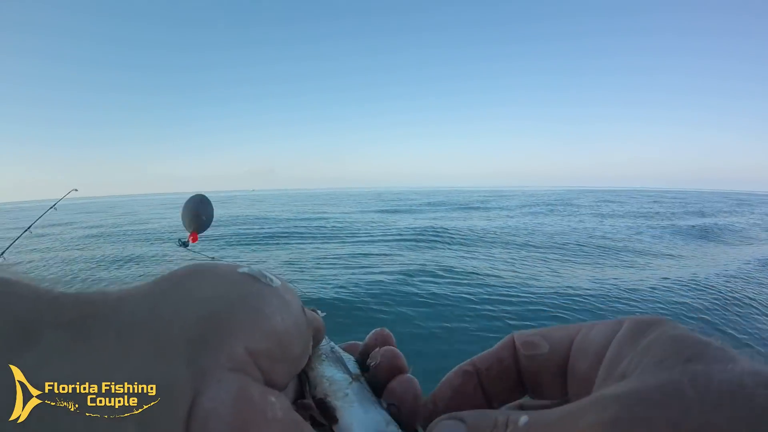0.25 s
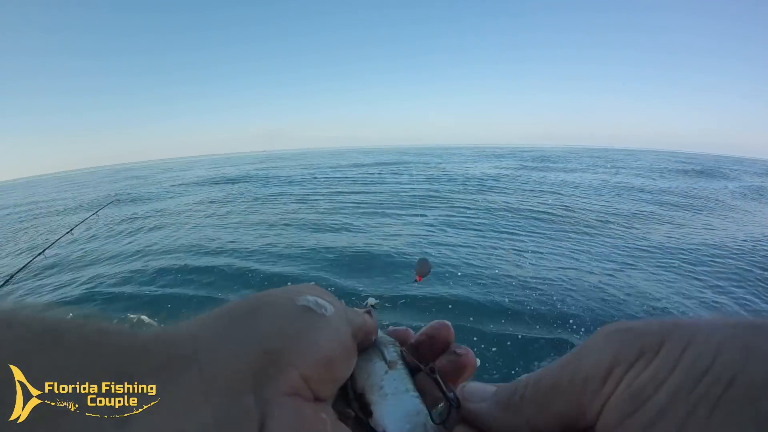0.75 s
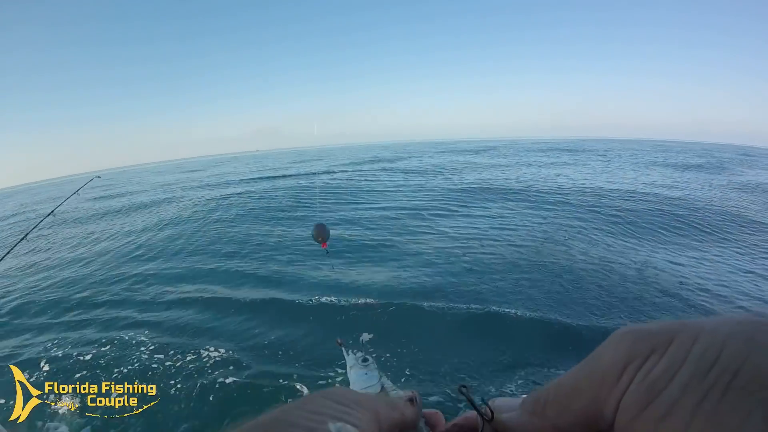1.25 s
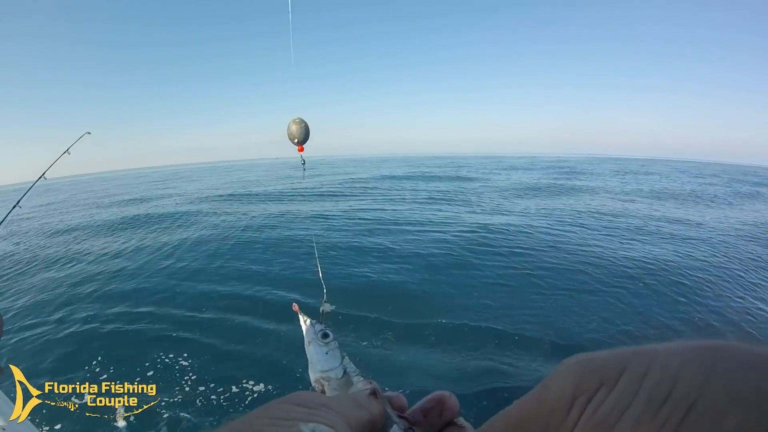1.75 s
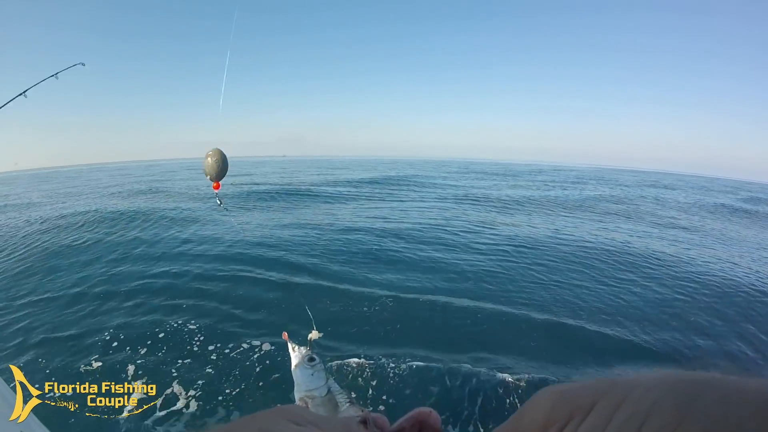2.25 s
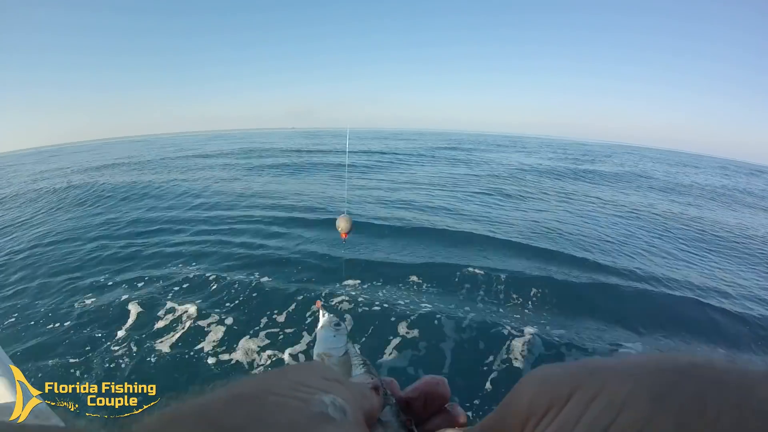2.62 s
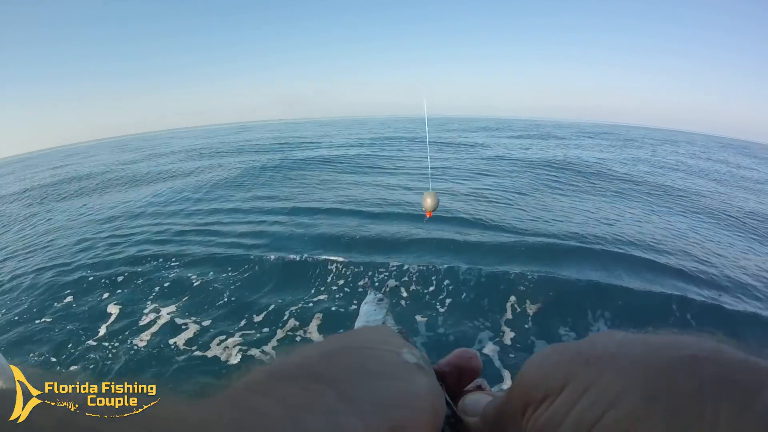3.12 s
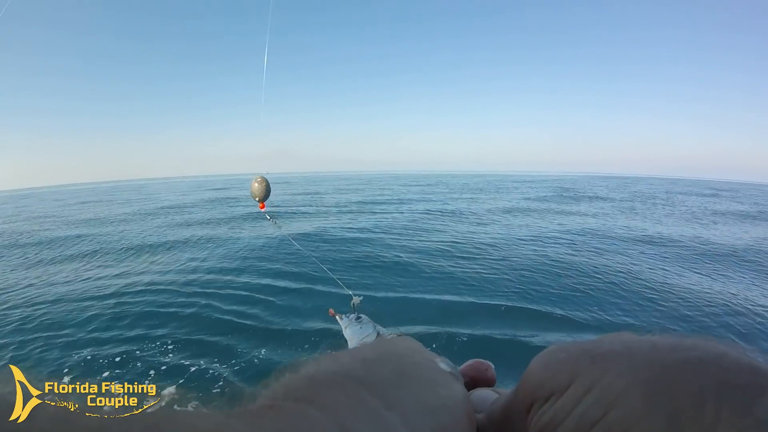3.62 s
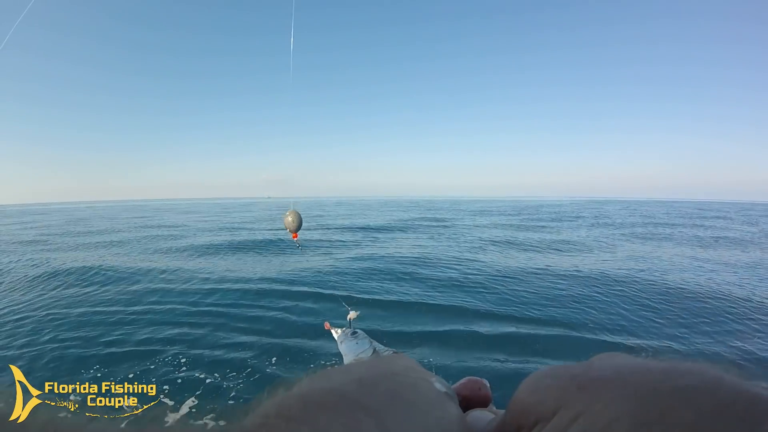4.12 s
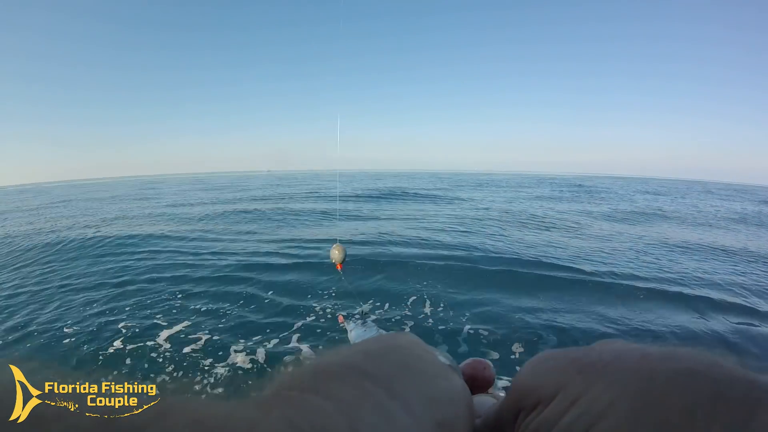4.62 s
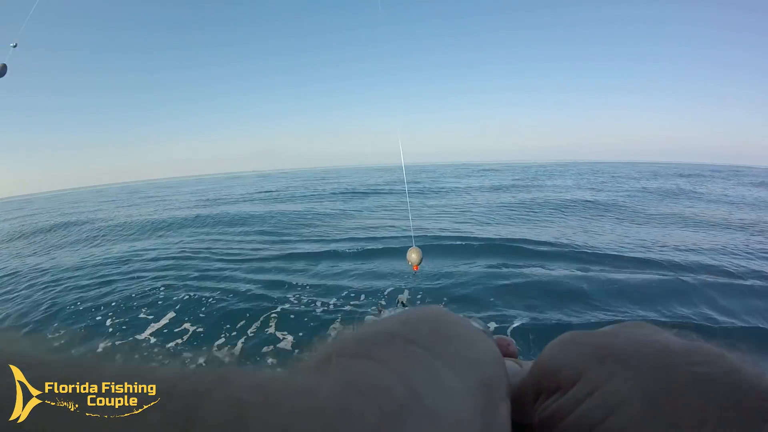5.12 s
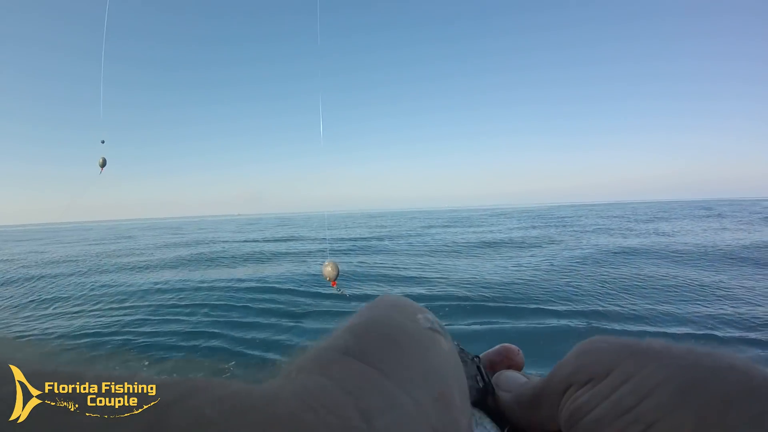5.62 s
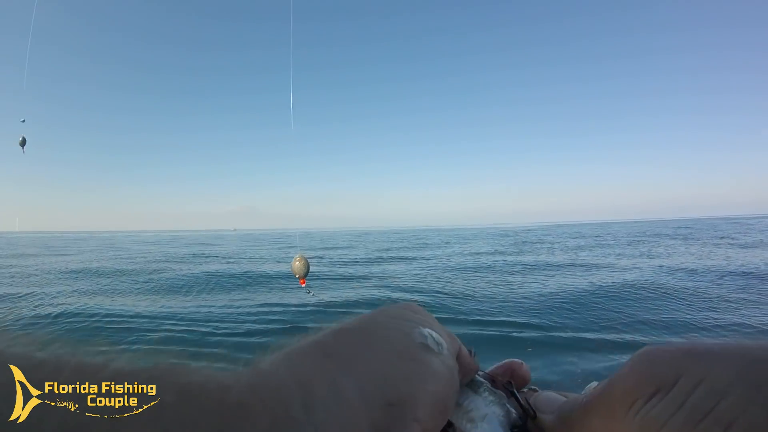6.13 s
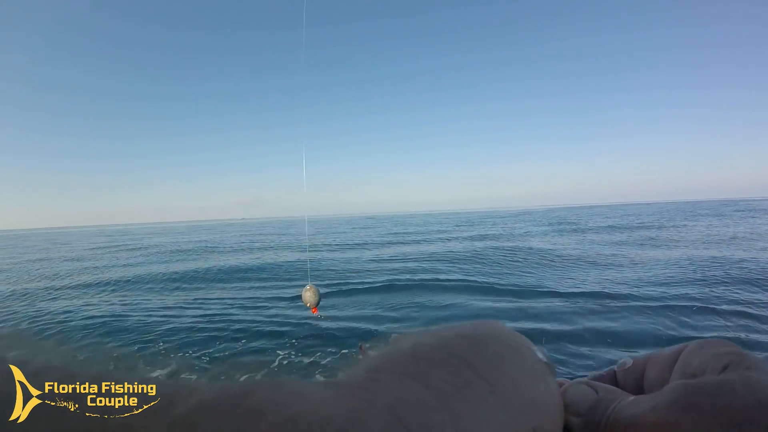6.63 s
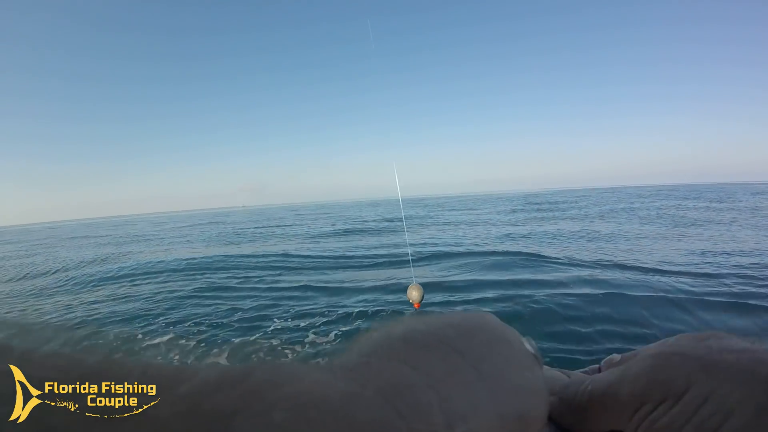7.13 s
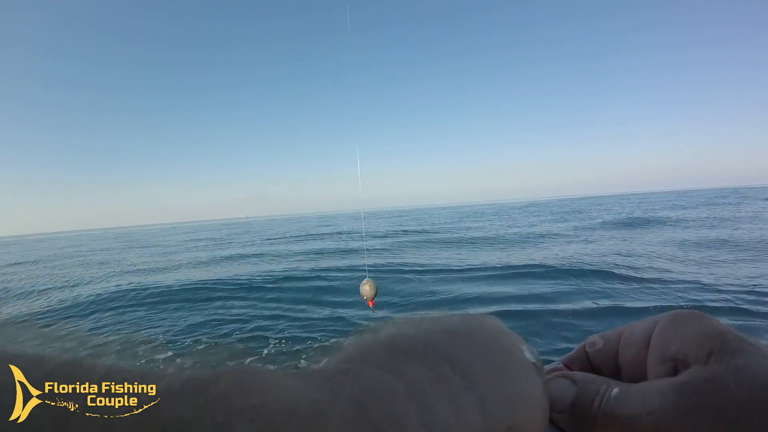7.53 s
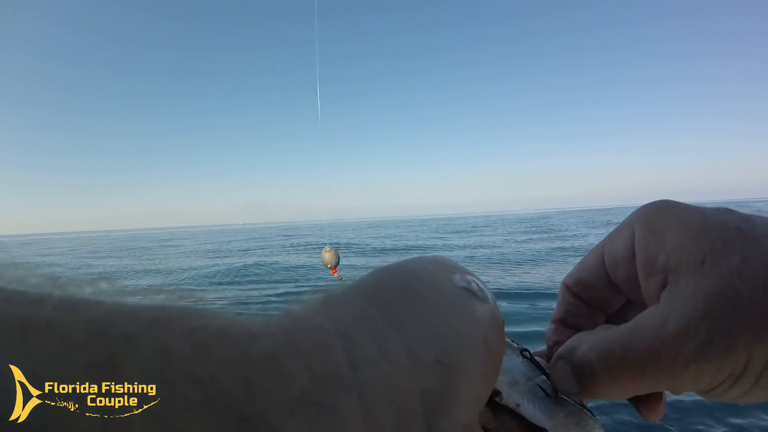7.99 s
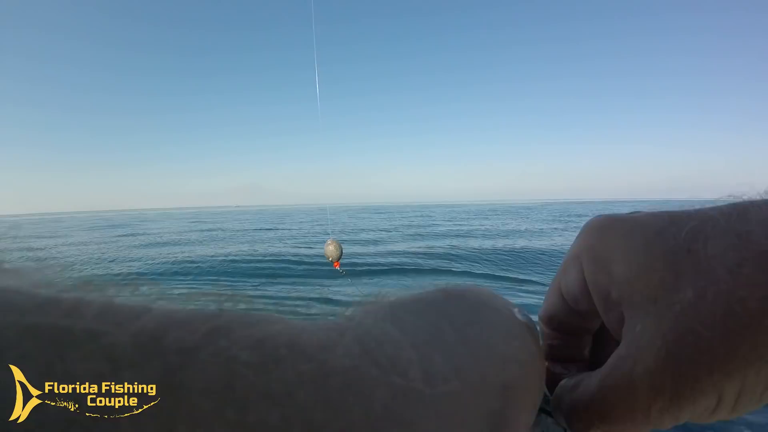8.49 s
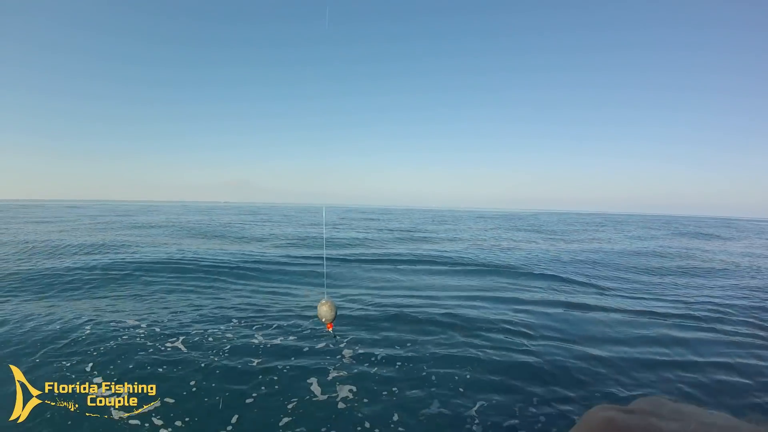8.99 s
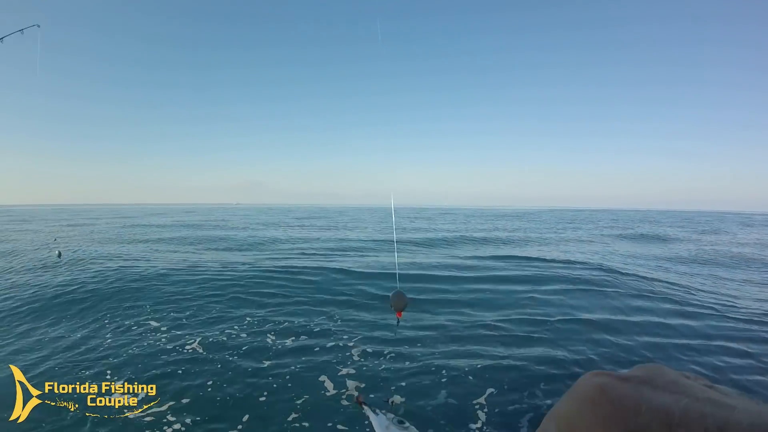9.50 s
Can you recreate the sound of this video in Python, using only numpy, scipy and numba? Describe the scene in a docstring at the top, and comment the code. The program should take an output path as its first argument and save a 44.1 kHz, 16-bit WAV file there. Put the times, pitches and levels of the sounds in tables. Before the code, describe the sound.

Irregular wet slaps, gulps and low hull booms, heard close on board a small boat. The first five seconds are busy, with bubbling froth, spray and ticking drops between blows; the rest is sparse, with faint plops, brief hollow pipe-like hums and gentle slaps near six and a half and eight and a half seconds. Open air, no echo, single-channel boxed-in microphone with a ringing treble edge and low steady hiss.

```python
"""Wavelets of a calm sea lap against the hull of a drifting boat, heard by a small cased microphone on board.
Crowds of decaying, gliding sines boom the hull, gulp, bubble and spray under slow wash and brief surges.
Harder blows slap with filtered noise bursts and a sagging plop; drops tick as damped sines.
Lone air pockets sing gliding notes, and a drain pipe closed at one end hums in odd partials.
Shaped noise gives far water and hiss; the microphone port rings in the treble and the case dulls it."""
import sys
import numpy as np
from scipy import signal
from scipy.fft import rfft, irfft, next_fast_len
from scipy.io import wavfile
from numba import njit

SR = 44100
rng = np.random.default_rng(int(sys.argv[2]) if len(sys.argv) > 2 else 0)


def pcm_store(signal):
    """Save signal as 16-bit PCM."""
    levels = np.round(np.clip(np.atleast_2d(signal), -1, 1) * 32767)
    wavfile.write(sys.argv[1], SR, levels.astype(np.int16).T)


N = 429974  # samples

# slow wash along the hull: (time [s], hull rumble level [dB], gulping level [dB], spray level [dB])
WASH = [(0, -65, -42.5, -36), (.21, -46, -46.5, -54.5), (.6, -38, -55, -43), (.97, -40, -48, -43.5),
        (1.17, -46, -45, -49.5), (1.58, -35.5, -41, -53.5), (1.75, -37, -35, -50),
        (2.02, -41.5, -35.5, -43.5), (2.16, -42.5, -46, -57.5), (2.72, -37.5, -34, -44.5),
        (3.07, -44.5, -46, -53.5), (3.38, -50, -52, -59), (3.94, -43, -35.5, -48), (4.27, -48.5, -50, -57),
        (4.78, -44, -37.5, -52), (5.02, -48, -49.5, -57.5), (5.74, -43, -53, -60.5),
        (5.89, -46.5, -47, -55), (6.46, -41, -58.5, -60), (6.65, -50, -48.5, -56.5), (7.22, -44, -63, -62),
        (8.09, -50.5, -59.5, -66.5), (8.9, -45, -53.5, -60.5), (9.75, -48.5, -60.5, -65.5)]
BUBBLING_OVER_MEAN_DB = -5  # wash bubbling, against the mean of gulping and spray in dB
# wavelets that break on the hull:
# (crest time [s], hold [s], gulping level [dB], bubbling level [dB], spray level [dB])
SPLASHES = [(0., 0.0025, -34, -36.5, -50), (0.349, 0.018, -35.5, -88, -72),
            (0.466, 0.0099, -26, -31.5, -24), (0.699, 0.057, -29, -38.5, -36),
            (0.755, 0.022, -34, -47, -33.5), (0.804, 0.13, -32.5, -43.5, -32.5),
            (1.203, 0.097, -63, -47, -42.5), (1.687, 0.049, -32.5, -43.5, -70),
            (1.89, 0.066, -46, -40.5, -57), (2.44, 0.011, -50, -38.5, -32.5),
            (2.464, 0.0066, -23.5, -31, -62), (2.677, 0.0066, -30, -32, -37), (3.538, 0.014, -34, -51, -79),
            (3.88, 0.12, -60, -46.5, -46.5), (4.522, 0.02, -26.5, -42, -39.5),
            (4.755, 0.058, -36, -58, -44.5), (6.519, 0.0033, -33, -38.5, -40),
            (6.622, 0.016, -42, -57, -48), (6.824, 0.082, -53, -58, -70), (7.579, 0.022, -40.5, -67, -82),
            (8.523, 0.055, -43, -50, -60), (8.775, 0.0099, -66, -78, -47), (8.852, 0.009, -42.5, -60, -68)]
SPLASH_RISE_DB_S = 582
# decay rates of a splash: gulping [dB/s], bubbling [dB/s], spray [dB/s]
SPLASH_FALLS = [266, 426, 417]
# heavier pushes that boom the hull: (crest time [s], hold [s], level [dB])
BOOMS = [(0., 0.0081, -35.5), (0.512, 0.08, -29.5), (2.034, 0.033, -33), (2.47, 0.068, -33.5),
         (2.668, 0.017, -26.5), (3.325, 0.017, -19.5), (3.386, .005, -24.5), (3.442, 0.06, -24.5),
         (3.765, 0.037, -31.5), (3.865, 0.02, -30), (4.584, 0.051, -24.5), (6.57, 0.061, -41),
         (7.49, 0.092, -40), (8.495, 0.041, -28)]
BOOM_RISE_DB_S, BOOM_FALL_DB_S = 246, 220
# hull resonances: (frequency [Hz], bandwidth [Hz], relative gain [dB])
HULL_MODES = [(49.7, 110, 8.5), (97.7, 18, 6.5)]
# slaps on the hull: (time [s], relative crack level [dB], crack frequency [Hz], relative plop level [dB],
# plop starting frequency [Hz], relative spray level [dB], 60 dB decay time of crack and spray [s])
SLAPS = [(0.441, -30, 1130, -31, 130, -33, 0.14), (0.463, -7.5, 610, -18.5, 165, -24, 0.027),
         (0.689, -16, 685, -23.5, 465, -50, 0.037), (2.408, -28.5, 1330, -36, 132, -43, 0.034),
         (2.453, -13, 700, -20, 395, -50, 0.017), (2.473, -23, 1500, -19.5, 182, -45, 0.015),
         (2.68, -4.5, 860, -17, 185, -20.5, 0.019), (4.484, -26.5, 1340, -41, 390, -42, 0.026),
         (4.525, -38, 738, -30, 245, -34, 0.019), (4.541, -26, 830, -30.5, 240, -33, 0.045),
         (5.773, -42, 686, -41, 301, -81, 0.063), (6.501, -15.5, 706, -24.5, 373, -33.5, 0.037),
         (6.523, -28, 710, -28, 174, -43, 0.019), (8.127, -45, 2030, -53, 132, -46, 0.1),
         (8.148, -36, 965, -54.5, 167, -39.5, 0.12), (8.47, -32.5, 610, -29, 129, -50, 0.029),
         (8.845, -46, 1480, -29.5, 260, -46, 0.023), (9.215, -42.5, 780, -36, 198, -73, 0.032)]
# hull side resonances under a slap: (frequency [Hz], bandwidth [Hz], relative gain [dB])
KNOCK_MODES = [(110, 48, 6.5), (200, 48, -3)]
# single drops that strike the hull:
# (time [s], relative tick level [dB], tick frequency [Hz], relative spray level [dB])
DROPS = [(0.662, -27, 680, -48), (0.458, -42, 1500, -24), (0.708, -35, 900, -27), (0.739, -22.5, 3370, -35),
         (0.759, -42, 1500, -25.5), (0.882, -21, 1740, -33), (1.578, -30, 616, -65),
         (1.673, -22.5, 715, -67), (1.755, -28, 1750, -55), (2.442, -28, 2030, -31),
         (2.463, -29, 1500, -35), (2.476, -30, 1980, -34), (2.654, -38, 1000, -35), (2.633, -24, 650, -42),
         (3.824, -27, 680, -65), (4.062, -33, 1600, -35), (4.333, -26, 780, -49), (4.433, -34, 900, -31),
         (4.453, -35, 1200, -33.5), (4.511, -27, 1450, -32), (4.549, -26, 1620, -37),
         (4.583, -28.5, 1150, -56), (4.876, -35, 815, -56), (4.738, -30.5, 1110, -55),
         (4.637, -45, 1000, -39), (4.751, -40, 1500, -44), (5.721, -41.5, 1970, -44),
         (5.913, -38.5, 2050, -40), (5.173, -31.5, 1210, -57), (6.229, -42, 1060, -37),
         (6.869, -41, 1100, -61), (7.04, -30.5, 478, -53), (7.072, -43, 676, -32.5), (8.829, -34, 760, -60),
         (8.566, -32.5, 700, -54), (8.848, -26, 1510, -54)]
DROP_T60_S = 0.013
# lone air pockets, pitches before wavering:
# (time [s], start frequency [Hz], end frequency [Hz], length [s], peak level [dB])
POCKETS = [(0.476, 146, 67.4, 0.065, -21.5), (0.69, 500, 594, 0.01, -18.5), (0.895, 338, 203, 0.03, -34),
           (0.746, 119, 104, 0.054, -21.5), (0.9, 112, 79.4, 0.074, -30), (2.487, 103, 59.6, 0.067, -23.5),
           (3.289, 72, 55.3, 0.054, -24.5), (3.455, 103, 69, 0.083, -29), (7.505, 157, 121, 0.026, -33),
           (7.763, 61.7, 56, 0.036, -32), (1.732, 1090, 1030, 0.014, -38), (1.783, 1380, 1520, 0.023, -40),
           (2.113, 486, 770, 0.03, -46), (2.246, 830, 1230, 0.014, -43.5),
           (2.41, 1450, 1480, 0.0077, -29.5), (2.299, 237, 237, 0.026, -30.5),
           (4.048, 305, 790, 0.037, -41), (4.331, 520, 537, 0.032, -41.5), (4.353, 880, 900, 0.021, -43.5),
           (4.486, 800, 745, 0.024, -36), (4.559, 215, 200, 0.0087, -18), (4.596, 1090, 1210, 0.012, -41),
           (4.757, 326, 355, 0.011, -30), (4.821, 298, 340, 0.0083, -32.5), (5.179, 1020, 1170, 0.015, -45),
           (5.49, 593, 760, 0.019, -50), (5.381, 1020, 890, 0.016, -49), (6.047, 493, 730, 0.017, -44.5),
           (6.165, 560, 750, 0.029, -48), (7.583, 292, 368, 0.027, -39.5), (8.103, 870, 890, 0.02, -51),
           (8.76, 6700, 4120, 0.026, -52), (8.512, 805, 880, 0.014, -42), (8.748, 210, 230, 0.016, -42.5),
           (9.049, 234, 812, 0.063, -45)]
# hums of a drain pipe shut by water at one end, levels before throbbing: (time [s],
# start frequency [Hz], end frequency [Hz], length [s], fundamental level [dB], third partial level [dB])
HUMS = [(5.865, 202, 224, 0.26, -44, -73), (6.74, 137.5, 149.7, 0.22, -43, -55),
        (6.98, 163.2, 153.3, 0.27, -48.5, -74), (8.87, 141.5, 152, 0.138, -47.5, -54.5),
        (9.02, 149.8, 160, 0.22, -44.5, -68)]
# spectrum of the background noise: (frequency [Hz], relative density [dB per Hz])
FLOOR_SPECTRUM = [(15, -39), (25, 5.5), (49, -23), (108, -5.5), (600, -27.5), (2230, -29.5), (4340, -46),
                  (5810, -36), (6460, -23), (9130, -31.5), (10200, -37), (14300, -42.5)]
FLOOR_DB = -58.5  # rms
# microphone port resonances: (frequency [Hz], bandwidth [Hz], gain at the centre if alone [dB])
PORT_MODES = [(4870, 3060, -11.5), (5380, 1300, 7), (6420, 257, 13.5)]
CASE_HZ, TOP_HZ = 7080, 14000  # low-pass corners


def laps():
    """Lapping as a sum of bubble crowds, where the powers of steady wash and brief surges add."""
    s, rumble_db, gulp_db, spray_db = np.transpose(WASH)
    bubble_db = (gulp_db + spray_db) / 2 + BUBBLING_OVER_MEAN_DB
    wash = rumble_db, gulp_db, bubble_db, spray_db
    crest, hold, *splash = np.transpose(SPLASHES)
    events = [surges(*np.transpose(BOOMS), BOOM_RISE_DB_S, BOOM_FALL_DB_S)]
    for db, fall in zip(splash, SPLASH_FALLS):
        events.append(surges(crest, hold, db, SPLASH_RISE_DB_S, fall))
    t = np.arange(N) / SR
    strengths = []
    for db, event_power in zip(wash, events):
        wash_power = undb(np.interp(t, s, db)) ** 2
        strengths.append(np.sqrt(wash_power + event_power))
    boom, gulp, bubble, spray = strengths

    pushes = bubbles(130, 31.5, 147, 0.86, 0.88, spread_db=5, octave_db=-2.5)
    hull = level(body(pushes, HULL_MODES), 0)
    gulps = bubbles(240, 122.6, 452.3, 4.34, 1.132, spread_db=2, octave_db=2)
    froth = level(bubbles(1000, 568, 2830, 6.8, 1.11, spread_db=0, octave_db=-2), -0.09)
    gurgles = level(bubbles(240, 450, 2200, 11, 1.15, spread_db=2.5, octave_db=-2), -1.5)
    spits = level(bubbles(280, 2500, 8000, 7, 1.08, spread_db=4, octave_db=0), -12)
    mist = level(bubbles(5500, 1880, 10000, 1.17, 1.03, spread_db=1.5, octave_db=3), -7)
    # foam bursts in clumps, which flare froth and mist together
    knots = np.arange(0, N, 1200)
    clumps = undb(2.4 * np.interp(np.arange(N), knots, rng.standard_normal(len(knots))))
    bubbling = clumps * froth + gurgles
    spraying = clumps * mist + spits
    return boom * hull + gulp * gulps + bubble * bubbling + spray * spraying


def surges(crest, hold, db, rise, fall):
    """Power addition of events that grow exponentially, hold a crest and decay, at constant dB per second."""
    t = np.arange(0, N + 64, 64)[:, None] / SR
    before, after = np.maximum(crest - t, 0), np.maximum(t - crest - hold, 0)
    power = np.sum(undb(db - rise * before - fall * after) ** 2, axis=1)
    return np.interp(np.arange(N) / SR, t[:, 0], power)


def bubbles(rate, low_hz, high_hz, cycles, glide, spread_db, octave_db):
    """Random superposition of damped bubbles, rate per second, evenly spread over octaves; rms 1."""
    when, pitch, life, luck = rng.random((int(rate * N / SR), 4)).T
    octaves = pitch * np.log2(high_hz / low_hz)
    # the wider the spread, the more a few strong bubbles stand out
    size = undb(-spread_db * np.log(1 - .96 * luck) + octave_db * octaves)
    start = (when * N).astype(np.int64)
    crowd = chirps(start, low_hz * 2 ** octaves, cycles * (.5 + life), glide, size, N, float(SR))
    return level(crowd, 0)


@njit
def chirps(start, hz, cycles, glide, size, n, sr):
    """Damped oscillators as turning phasors: pitch moves by the factor glide over the time of their cycles."""
    out = np.zeros(n)
    for k in range(len(start)):
        steps = cycles[k] * sr / hz[k]
        angle = 2 * np.pi * hz[k] / sr
        phasor = 1 + 0j
        step = np.exp(1j * angle)
        turn = np.exp(1j * angle * (glide - 1) / steps)
        # the difference of a slow and a quick decay swells quickly, then dies away
        slow, quick, fade = size[k], size[k], np.exp(-2 / steps)
        for i in range(start[k], min(n, start[k] + int(2.5 * steps))):
            step *= turn
            phasor *= step
            slow *= fade
            quick *= fade ** 8
            out[i] += (slow - quick) * phasor.imag
    return out


def slaps():
    """Impact of water: a noise crack, the plop of a trapped pocket, a resonant knock of the hull side, spray."""
    t = np.arange(int(.25 * SR)) / SR
    out, knock, spray = np.zeros((3, N + len(t)))
    for s, crack_db, crack_hz, plop_db, plop_hz, spray_db, t60 in SLAPS:
        here = slice(int(s * SR), int(s * SR) + len(t))
        crack_noise, knock_noise, spray_noise = rng.standard_normal((3, len(t)))
        fall = np.log(1000) * t / t60
        # the sheet of water lands in uneven spatters a few ms apart
        spatter_db = 3.5 * rng.standard_normal(len(t) // 128 + 1)
        spatter = undb(np.repeat(spatter_db, 128)[:len(t)])
        burst = np.minimum(t / 0.0014, 1) * np.exp(-fall) * spatter
        crack = ring(burst * crack_noise, crack_hz, .9 * crack_hz)
        crack = ring(crack, crack_hz, 1.3 * crack_hz)
        # the pocket sags in pitch as it opens
        plop_envelope = np.minimum(t / 0.0039, 1) * np.exp(-fall / 1.92)
        plop = plop_envelope * np.sin(2 * np.pi * plop_hz * t * (1 - 1.63 * t))
        knock_envelope = np.minimum(t / 0.0079, 1) * np.exp(-fall / 9)
        out[here] += undb(crack_db + 11) * crack + undb(plop_db + 9) * plop
        knock[here] += undb(plop_db) * knock_envelope * knock_noise
        spray[here] += undb(spray_db) * burst * spray_noise
    knock = undb(12) * body(knock, KNOCK_MODES)
    spray = undb(5.5) * ring(spray, 5100, 3800)
    return (out + knock + spray)[:N]


def drops():
    """Impulsive excitation by a drop: an exponentially damped tick with a fleck of filtered noise as spray."""
    t = np.arange(int(.03 * SR)) / SR
    envelope = np.minimum(t / 0.00016, 1) * np.exp(-np.log(1000) * t / DROP_T60_S)
    out = np.zeros(N)
    for s, tick_db, tick_hz, spray_db in DROPS:
        fleck = ring(envelope * rng.standard_normal(len(t)), 5700, 5000)
        tick = envelope * np.sin(2 * np.pi * tick_hz * t)
        out[int(s * SR):][:len(t)] += undb(tick_db) * tick + undb(spray_db + 2.5) * fleck
    return out


def pockets():
    """Oscillation of single trapped air pockets: a short note of gliding, slightly wavering frequency."""
    out = np.zeros(N)
    for s, start_hz, end_hz, length, db in POCKETS:
        u = np.linspace(0, 1, int(length * SR))
        waver = np.interp(u, np.linspace(0, 1, 12), rng.standard_normal(12))
        hz = start_hz * (end_hz / start_hz) ** u * (1 + 0.036 * waver)
        note = np.sin(np.pi * u) ** 0.35 * np.sin(2 * np.pi * np.cumsum(hz) / SR)
        out[int(s * SR):][:len(u)] += undb(db) * note
    return out


def hums():
    """Odd partials of a pipe closed at one end: first, third and fifth, each throbbing as water stirs it."""
    out = np.zeros(N)
    for s, start_hz, end_hz, length, db, odd_db in HUMS:
        u = np.linspace(0, 1, int(length * SR))
        angle = 2 * np.pi * np.cumsum(start_hz * (end_hz / start_hz) ** u) / SR
        swell = np.sqrt(np.sin(np.pi * u ** 1.65))
        for order, part_db in ((1, db), (3, odd_db), (5, odd_db - 2)):
            throb = undb(4 * np.interp(u, np.linspace(0, 1, 9), rng.standard_normal(9)))
            out[int(s * SR):][:len(u)] += undb(part_db) * throb * swell * np.sin(order * angle)
    return out


def floor():
    """Stationary noise of far water and microphone hiss, white noise weighted by a smooth spectrum."""
    hz, db = np.transpose(FLOOR_SPECTRUM)
    size = next_fast_len(N)
    log_hz = np.log(np.arange(size // 2 + 1) * SR / size + 1)  # 1 Hz is added to keep the log finite
    weight = undb(np.interp(log_hz, np.log(hz), db))
    noise = irfft(rfft(rng.standard_normal(size)) * weight, size)[:N]
    return level(noise, FLOOR_DB)


def undb(db):
    """Amplitude ratio of a level in decibels."""
    return 10 ** (np.asarray(db) / 20)


def level(x, db):
    """Division by the rms amplitude, then gain: a signal of rms 1 comes out at rms db."""
    return x * undb(db) / np.sqrt(np.mean(x ** 2))


def ring(x, hz, width):
    """A second-order resonance with gain 1 at its centre."""
    return signal.lfilter(*signal.iirpeak(hz, hz / width, fs=SR), x)


def body(x, modes):
    """Modal superposition: parallel resonances driven by one force."""
    return sum(undb(db) * ring(x, hz, width) for hz, width, db in modes)


def scene():
    """Linear superposition of all water sounds in one channel."""
    return (laps() + slaps() + drops() + pockets() + hums())[None]


def record(dry):
    """Transmission chain: port resonance, low-pass case, added noise floor, soft saturation and band limit."""
    port = dry + sum((undb(db) - 1) * ring(dry, hz, width) for hz, width, db in PORT_MODES)
    cased = signal.sosfilt(signal.butter(3, CASE_HZ, fs=SR, output="sos"), port)
    rounded = np.tanh(2 * (cased + floor())) / 2
    return signal.sosfilt(signal.ellip(8, .2, 70, TOP_HZ, fs=SR, output="sos"), rounded)


dry = scene()
out = record(dry)
pcm_store(out)
```